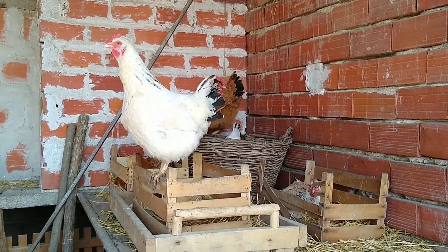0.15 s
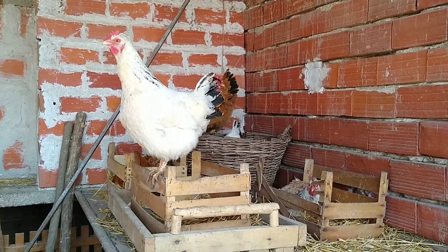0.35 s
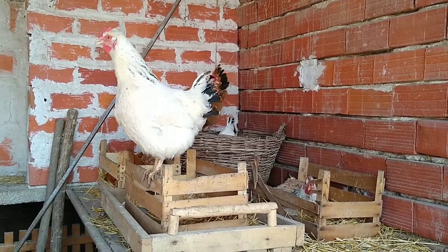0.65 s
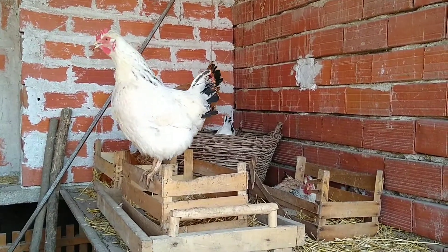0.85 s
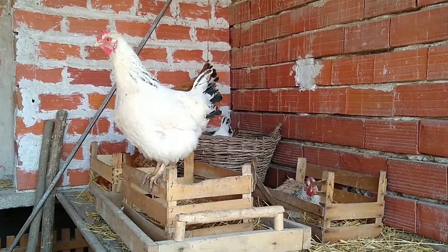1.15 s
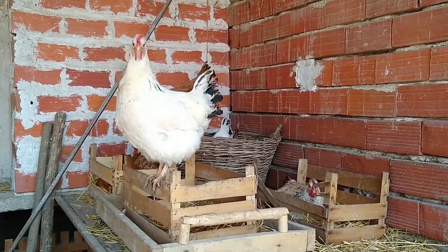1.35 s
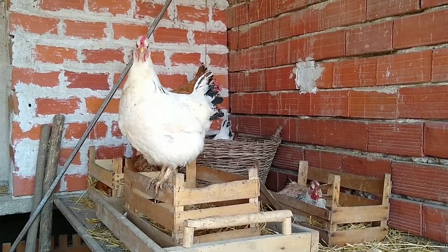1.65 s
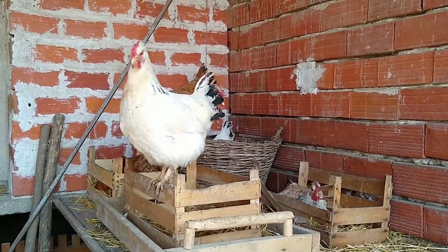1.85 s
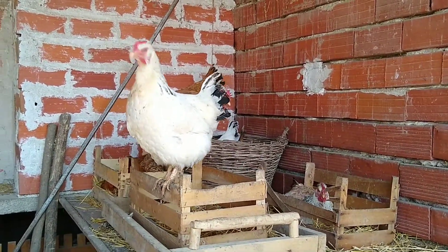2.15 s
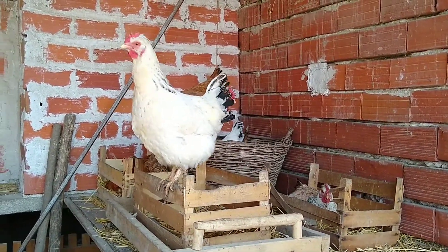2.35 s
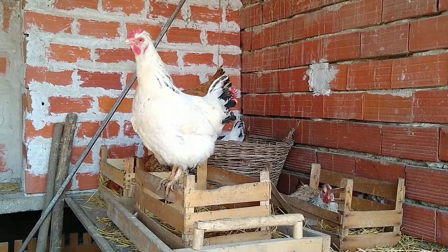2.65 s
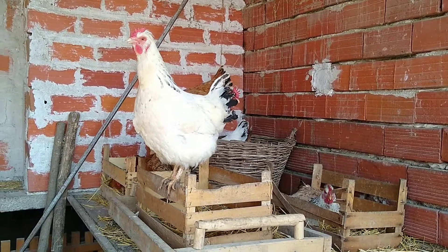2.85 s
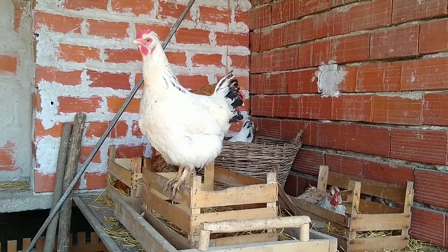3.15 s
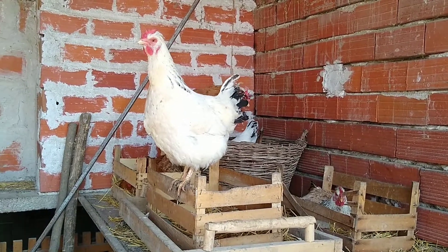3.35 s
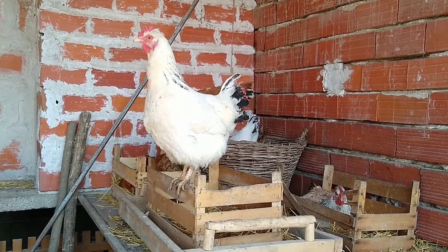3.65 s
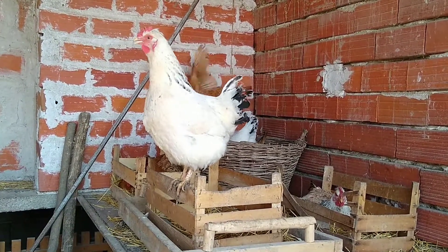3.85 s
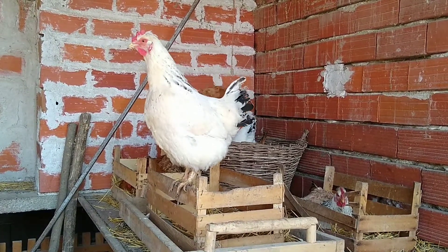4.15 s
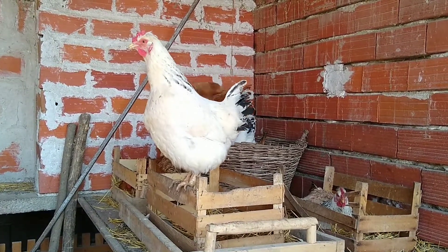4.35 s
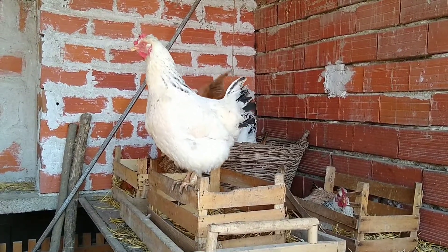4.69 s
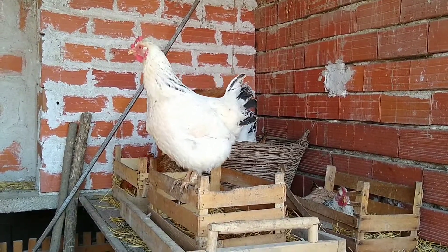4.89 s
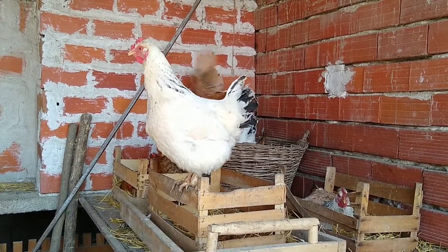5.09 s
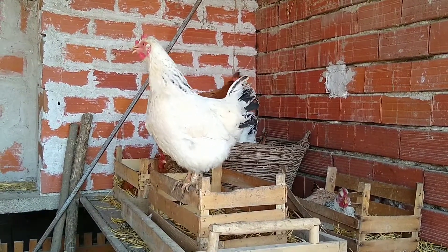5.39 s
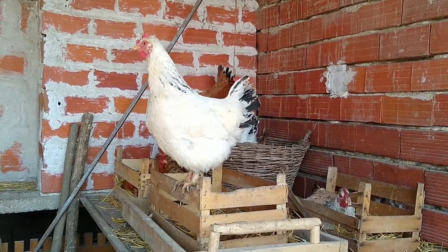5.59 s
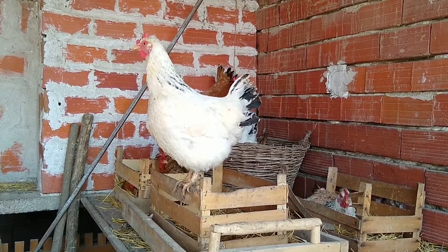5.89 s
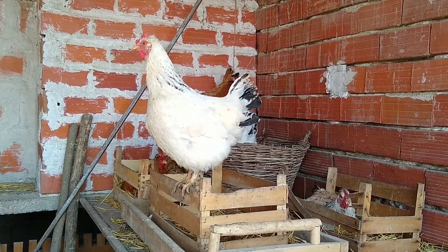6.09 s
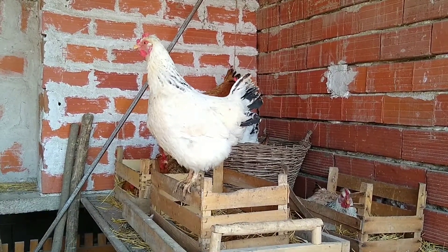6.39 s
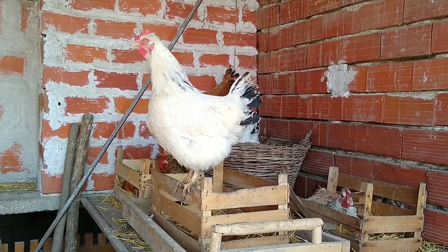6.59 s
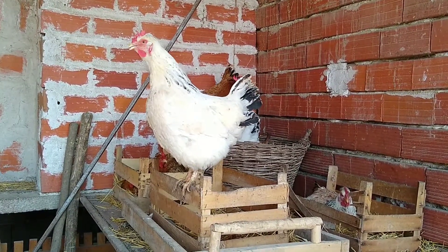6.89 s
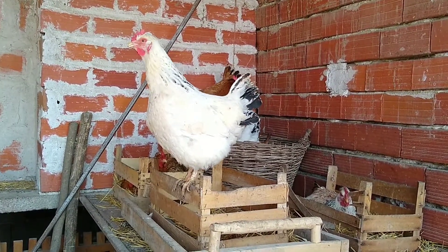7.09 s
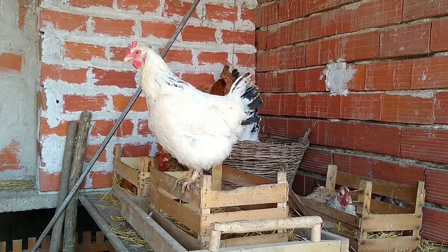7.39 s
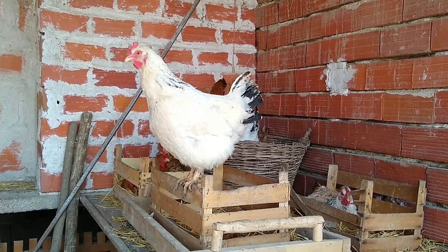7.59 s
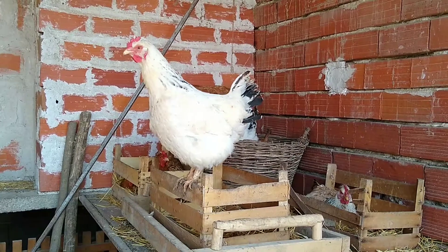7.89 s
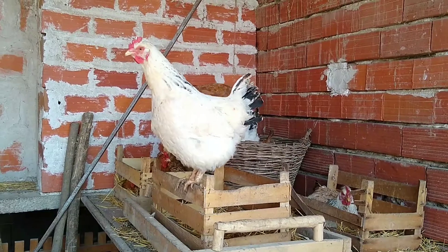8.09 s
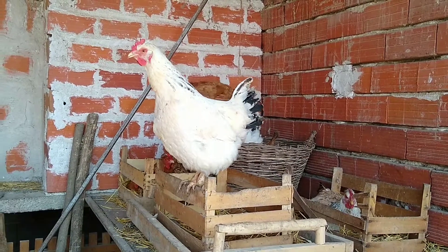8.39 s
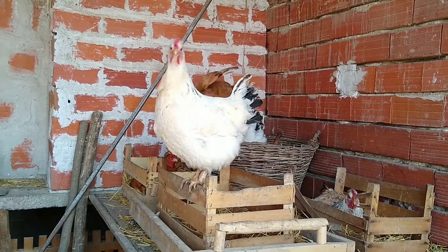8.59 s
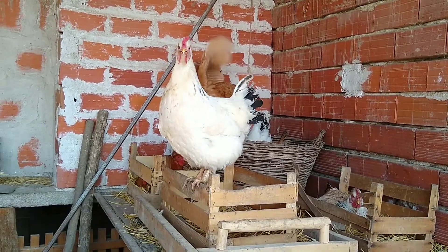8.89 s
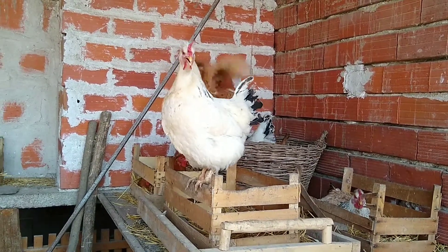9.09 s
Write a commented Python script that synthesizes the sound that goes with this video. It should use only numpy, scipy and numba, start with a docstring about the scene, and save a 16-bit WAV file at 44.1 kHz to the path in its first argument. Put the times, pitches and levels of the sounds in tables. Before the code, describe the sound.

Quick low clucks come in uneven bursts, punctuated by sharp higher squawks from a few chickens, close up in a small brick shelter.

```python
"""Hens in a brick coop

Runs of short clucks, broken by long high and low squawks from several hens. Each voice is
syrinx pulses and breath noise filtered by throat, chest, mouth and beak, with echoes of decaying noise.
A crate is tapped once. The hand-held two-port recorder adds thumps, a low rumble and capsule hiss
to the faint air of the coop."""
import sys
import numpy as np
from scipy import signal
from scipy.fft import rfft, irfft, next_fast_len
from scipy.io import wavfile
from scipy.ndimage import uniform_filter1d
from numba import njit

SR = 44100
rng = np.random.default_rng(int(sys.argv[2]) if len(sys.argv) > 2 else 0)


def unload_wav(signal):
    """Save mono or channel-first audio to the path in sys.argv[1] as 16-bit WAV at rate SR, clipped to [-1, 1]."""
    wavfile.write(
        sys.argv[1],
        SR,
        np.round(np.clip(np.atleast_2d(signal).T, -1, 1) * 32767).astype(np.int16),
    )


N = 407484

# One row per cluck: t/s, level/dB before its swell, rise/s, length/s, pitch f/Hz before its arch, mouth f/Hz
CLUCK_CALLS = [(0.624, -19, 0.027, 0.0943, 246.3, 2048), (1.142, -33.5, 0.0089, 0.044, 236.2, 2320),
               (1.35, -21.5, 0.03, 0.0658, 248.9, 2786), (1.567, -27, 0.017, 0.058, 250.8, 3325),
               (1.774, -23.5, 0.027, 0.0554, 248.8, 2385), (1.962, -16.5, 0.035, 0.062, 248.1, 2660),
               (2.064, -26.5, 0.02, 0.0638, 273.8, 2880), (2.228, -16, 0.034, 0.059, 246.9, 2315),
               (2.338, -27.5, 0.018, 0.07, 274.3, 2960), (2.494, -17, 0.044, 0.075, 251.5, 2240),
               (2.554, -19.5, 0.025, 0.075, 232.1, 2480), (2.612, -17.5, 0.03, 0.079, 248, 2270),
               (2.855, -29.5, 0.022, 0.087, 260.9, 2160), (3.134, -26, 0.03, 0.066, 263.6, 2174),
               (3.4, -35.5, 0.018, 0.043, 258.7, 1865), (3.451, -27, 0.035, 0.071, 272, 2720),
               (3.554, -20, 0.026, 0.05446, 236, 2967), (3.634, -35, 0.015, 0.051, 246.4, 2400),
               (3.684, -26, 0.02, 0.075, 287.2, 2810), (3.845, -17.5, 0.025, 0.0822, 253.1, 2470),
               (4.263, -31.5, 0.024, 0.082, 278, 2850), (4.572, -25.5, 0.027, 0.0587, 275.7, 2205),
               (4.689, -17.5, 0.019, 0.067, 229.9, 1914), (4.816, -31.5, 0.026, 0.062, 228.1, 1966),
               (5.193, -27.5, 0.035, 0.076, 238.1, 3012), (5.26, -29.5, 0.015, 0.041, 287.4, 2767),
               (5.707, -40, 0.013, 0.0403, 222.6, 2860), (5.929, -40.5, 0.01, 0.0451, 206.7, 2731),
               (6.367, -20, 0.032, 0.061, 244, 2340), (6.6, -17, 0.062, 0.0997, 253.5, 2014),
               (7.164, -31, 0.033, 0.077, 208.7, 1852), (7.362, -33, 0.025, 0.063, 251, 2030),
               (7.458, -27.5, 0.041, 0.064, 254.3, 2866), (7.608, -31, 0.023, 0.062, 231, 2800),
               (7.778, -19.5, 0.039, 0.071, 245.8, 2850), (7.898, -32.5, 0.0026, 0.057, 227.5, 2988),
               (8.049, -18.5, 0.026, 0.065, 239.2, 2340), (8.251, -33.5, 0.017, 0.051, 201, 2830),
               (8.378, -19.5, 0.029, 0.072, 239.1, 2320), (8.549, -27, 0.04, 0.054, 255.2, 2020),
               (8.637, -19, 0.031, 0.073, 238.4, 2790), (8.794, -29, 0.024, 0.0755, 236.7, 2108),
               (8.908, -17.5, 0.03, 0.078, 256, 2520), (9.066, -31, 0.015, 0.04, 240.2, 2100)]
# Effort from soft to loud: level/dB at either end
EFFORT_LEVELS = (-29.5, -22.5)
# Values at the (soft, loud) ends: throat f/Hz at full opening, base brightness level/dB, roughness [0-1]
EFFORT_THROAT = (857, 1000.9)
EFFORT_BRIGHTNESS = (-16, -19.5)
EFFORT_ROUGHNESS = (0.48, 0.5512)
# A wider mouth rings higher and stronger: f/Hz, level/dB
CLUCK_MOUTH_GAIN = [(2100, -1), (2500, 5), (2900, 11.5)]
# Cluck pitch at start, top of the rise and end [share of its pitch]
PITCH_ARCH = (0.72, 1.05, 0.94)
# Beak resonances in a cluck: f/Hz, width/Hz, level/dB
CLUCK_BEAK_RINGS = [(3240, 280, 1), (3726, 420, 3.5)]


def clucks():
    """Each cluck snaps on, swells while the beak opens and the pitch arches, then is choked off."""
    out = np.zeros(N)
    for start, peak_db, rise, length, pitch, mouth in CLUCK_CALLS:
        throat = np.interp(peak_db, EFFORT_LEVELS, EFFORT_THROAT)
        bright_db = np.interp(peak_db, EFFORT_LEVELS, EFFORT_BRIGHTNESS)
        rough = np.interp(peak_db, EFFORT_LEVELS, EFFORT_ROUGHNESS)
        t = np.arange(round((length + 0.024) * SR)) / SR
        opening = np.interp(t, [0, rise, length], [0, 1, 0.85])
        arch = np.interp(t, [0, rise, length], PITCH_ARCH)
        swell_s = [0, 0.0015, rise, 0.5 * (rise + length), length, length + 0.028]
        swell_db = np.interp(t, swell_s, [-48.5, -15.5, 3.0, 3.5, -5.5, -36.5])
        # soft clucks keep the beak closed, so chest and air sacs stand out
        softness_db = -16.5 - peak_db
        sound = voice(
            pitch * arch, throat * (0.65 + 0.35 * opening),
            mouth, at_hz(CLUCK_MOUTH_GAIN, mouth), CLUCK_BEAK_RINGS,
            chest_db=-12 + 0.067 * softness_db, boom_db=-30 + 0.7 * softness_db,
            bright_db=bright_db - 2.5 + 0.42 * swell_db, rough=rough, half=0.0)
        add(out, amp(peak_db + swell_db) * sound, start)
    return out


# One list per high squawk, from more than one hen: t/s, pitch f/Hz, level/dB, hoarseness [about 0-1]
HIGH_CALLS = [
    [(0.785, 534, -34.5, 0.7), (0.797, 544.3, -10, 0.7), (0.835, 586, -16.5, 1), (0.875, 527.3, -16, 0),
     (0.969, 502.7, -27, 0.05), (1.039, 550, -13, 0.05), (1.065, 482.6, -19.5, 0.3), (1.088, 485, -28, 0.7)],
    [(3.978, 504.4, -28, 0.5), (3.996, 516, -10.5, 0.9), (4.024, 602.5, -16.5, 1.1),
     (4.056, 508, -12, 0.05), (4.1, 521.3, -21.5, 0.2), (4.132, 524, -21, 1.1), (4.17, 526.8, -16, 0.05),
     (4.21, 502, -23.5, 0.4), (4.25, 469, -38.5, 0.6)],
    [(4.907, 522, -31.5, 0.5), (4.92, 545.6, -17.5, 1.0), (4.935, 576, -18.5, 0.9),
     (4.955, 570.7, -22, 0.5), (4.99, 554.6, -22.5, 0.63), (5.047, 533, -16.5, 0.3),
     (5.095, 499.6, -26, 0.5), (5.13, 488, -29, 0)],
    [(5.46, 510.6, -10, 0.6), (5.502, 532.3, -25.5, 0.6), (5.558, 492.1, -16, 0.6),
     (5.64, 456.3, -34.5, 0.6), (5.67, 428, -43, 0.9)],
    [(6.764, 457, -23.5, 0.8), (6.786, 554, -11.5, 0.9), (6.82, 584.2, -19, 0.5),
     (6.855, 502.7, -17.5, 0.15), (6.9, 503.6, -30.5, 1), (6.94, 524.7, -26.5, 0.7), (6.996, 476, -16, 0.2),
     (7.035, 450.4, -50, 0)],
    [(9.092, 480.5, -29.5, 0.6), (9.106, 519.8, -9, 0.6), (9.128, 566, -18, 0.4), (9.174, 471.3, -20, 0.1),
     (9.24, 453, -25.5, 0.15)],
]
# One list per low squawk: t/s, pitch f/Hz, level/dB, hoarseness [0-1]
LOW_CALLS = [
    [(0.0, 326.6, -7.5, 0.26), (0.016, 330.2, -17.5, 0.05), (0.042, 337.4, -18, 0.05),
     (0.058, 355, -21.5, 0.86), (0.085, 325.3, -30.5, 0.9), (0.12, 320, -42, 0.9)],
    [(5.298, 304, -37.5, 1), (5.314, 317, -12.5, 0.38), (5.34, 345, -17.5, 0.5), (5.37, 346, -16.5, 0.08),
     (5.46, 347, -19.5, 0.071), (5.52, 338, -20, 0.14), (5.56, 348.4, -22, 0.2), (5.58, 359.6, -21, 0.87),
     (5.62, 330, -43, 0.6)],
]
# One row per squawk: mouth f/Hz at mean pitch, mouth level/dB,
# base beak brightness level/dB for a call at -18 dB, half-pitch share per hoarseness
HIGH_CALL_MOUTHS = [(1852, 4.5, -15.5, 0.55), (1987, 1.5, -14.5, 0.6), (2608, 9, -12, 1.2),
                    (2005, 0.5, -14.5, 0.84), (1960, 2, -13, 0.797), (2068, 1.5, -12.5, 0.34)]
LOW_CALL_MOUTHS = [(2050, 2.2, -11, 0.14), (1963, 0.071, -11, 0.1)]
# Beak resonances for the high and the low squawks: f/Hz, width/Hz, level/dB
HIGH_BEAK_RINGS = [(3357, 53, 0.28), (3506, 380, 4)]
LOW_BEAK_RINGS = [(2375, 200, -3), (3224, 200, 8.5), (3670, 860, 0)]
HIGH_THROAT_HZ, LOW_THROAT_HZ = 1050.9, 1169
CLEAR_ROUGH, HOARSE_ROUGH = 0.15, 0.65  # roughness at hoarseness 0 and 1
BEAK_STEADY = 0.18  # share of the level swing that the beak does not follow
BEAK_OPEN_S, BEAK_SHUT_DB = 0.016, -12.5  # the beak opens just after the start
SQUAWK_LOW_CUT_HZ = 410  # a stretched neck and open beak radiate little below this


def squawks(calls, throat, mouths, beak, chest_db):
    """Long calls on a held breath; hoarse stretches turn rough and break into half pitch."""
    out = np.zeros(N)
    for rows, (mouth, mouth_db, beak_db, most_half) in zip(calls, mouths):
        times, *columns = np.transpose(rows)
        t = np.arange(times[0], times[-1], 1 / SR)
        pitch, level_db, hoarse = [np.interp(t, times, column) for column in columns]
        rough = CLEAR_ROUGH + (HOARSE_ROUGH - CLEAR_ROUGH) * hoarse
        swing_db = np.clip(level_db + 18, -10, 10)
        shut = np.clip(1 - (t - times[0]) / BEAK_OPEN_S, 0, 1)
        bright_db = beak_db - BEAK_STEADY * swing_db + BEAK_SHUT_DB * shut
        to_nearest_end = np.minimum(t - times[0] + 0.003, times[-1] - t + 0.0028)
        edges = np.clip(to_nearest_end / 0.0012, 0, 1)
        sound = voice(pitch, throat + 0 * t, mouth, mouth_db, beak, chest_db, -57.5,
                      bright_db, rough, most_half * hoarse)
        add(out, edges * amp(level_db) * sound, times[0])
    low_cut = signal.butter(4, SQUAWK_LOW_CUT_HZ, "high", fs=SR, output="sos")
    return signal.sosfilt(low_cut, out + 1e-18)


# Chest resonance, one pair: f/Hz, width/Hz
CHEST_RING = (621.4, 394.7)
# Upper resonances shared by all calls: f/Hz, width/Hz, level/dB
RASP_RINGS = [(5137, 560, -12), (5970, 1200, -18.5), (10800, 36000, -21)]
THROAT_WIDTH_HZ, MOUTH_WIDTH_HZ = 250.36, 260


def voice(pitch, throat, mouth, mouth_db, beak, chest_db, boom_db, bright_db, rough, half):
    """Syrinx pulses and pulsed breath pass throat, chest, mouth and beak; low and high parts are evened."""
    count, rough, half = len(pitch), np.clip(rough, 0, 1), np.clip(half, 0, 1)
    jitter = 0.0985 * rough ** 1.495 * wander(count, 261.2)
    phase = 2 * np.pi * (rng.random() + np.cumsum(pitch * (1 + jitter)) / SR)
    orders = np.arange(1, int(17000 / pitch.max()))[:, None]
    pulses = np.cos(orders * phase).sum(axis=0) * np.sqrt(pitch / SR) * 2
    pulses *= 1 + half * np.cos(phase / 2)  # strong-weak pairs give half-pitch lines
    pulses *= amp(8 * rough * wander(count, 90))  # uneven pulse strength
    breath = rng.standard_normal(count) * (1 + 0.7 * np.cos(phase))  # gated by each cycle
    source = np.sqrt(1 - rough ** 2) * pulses + 0.9 * rough ** 1.5 * breath

    low = glide_twice(source, throat, THROAT_WIDTH_HZ)
    low -= amp(chest_db) * resonate_twice(source, *CHEST_RING)
    low += amp(boom_db) * resonance(source, pitch.mean(), 160)  # air sacs swell with the fundamental

    # the mouth opens as the pitch climbs
    mouth_hz = mouth * (pitch / pitch.mean()) ** 0.8
    high = amp(mouth_db) * glide_twice(source, mouth_hz, MOUTH_WIDTH_HZ)
    for hz, width, db in beak + RASP_RINGS:
        # grainy breath takes a larger share in higher resonances
        grain = breath * amp(8.3 * wander(count, 65))
        airy = source + np.clip(hz / 12000, 0, 1) ** 2 * grain
        high += amp(db) * resonate_twice(airy, hz, width)
    return even(low) + amp(bright_db - 0.5) * even(high)


KNOCK_S, KNOCK_DB = 0.512, -34


def knock():
    """A dull tap on a crate: a soft click ringing briefly in thin wood."""
    click = np.zeros(N) + 1e-18
    click[round(KNOCK_S * SR)] = 1
    ring = resonance(click, 300, 350) - resonance(click, 1000, 810)
    return amp(KNOCK_DB) * ring / np.abs(ring).max()


# Thumps on the housing: t/s, relative level/dB, length/s
HOUSING_THUMPS = [(0.597, -48.5, 0.057), (2.498, -54.5, 0.042), (7.62, -63, 0.049), (7.912, -38.5, 0.042),
                  (8.026, -39.5, 0.026), (8.064, -50.5, 0.028), (8.226, -34.5, 0.017), (8.676, -44, 0.03)]


def thumps():
    """Each push on the housing starts quick and slackens, so its tone sinks."""
    out = np.zeros(N)
    for start, level_db, length in HOUSING_THUMPS:
        t = np.arange(round(length * SR)) / SR
        cycles = np.cumsum(70 + 150 * np.exp(-t / 0.01)) / SR
        swell = np.sin(np.pi * t / length) ** 0.83
        add(out, amp(level_db + 16.5) * swell * np.sin(2 * np.pi * cycles), start)
    return out


def rumble():
    """The housing rocks in the hand: noise through two low resonances, its level lumpy."""
    rocking = resonance(resonance(rng.standard_normal(N), 79, 49), 60, 160)
    return amp(-56.5 + 4.5 * wander(N, 20)) * rms_one(rocking)


def handling():
    """Rumble and thumps push one port while pulling the other."""
    return (rumble() + thumps()) * [[0.75], [-1]]


# Echo decay between the brick walls: f/Hz, time to fall 60 dB/s
COOP_DECAY = [(200, 0.397), (1000, 0.22), (3000, 0.16), (8000, 0.097)]
# Echo that differs between the ports: f/Hz, strength relative to the shared echo
ECHO_SPREAD = [(200, 1.0), (600, .45), (1200, .3), (3000, .9), (8000, 4)]
YARD_DB, YARD_T60_S = -24.5, 0.81  # tail of the shed beyond, relative to the coop's start


def coop(x):
    """Dense brick-wall echoes in octave bands of dying noise, and a faint long tail from the shed beyond."""
    t = np.arange(round(1.2 * SR)) / SR
    tails = np.zeros((2, len(t)))
    for low in 150 * 2.0 ** np.arange(7):
        centre = np.sqrt(2) * low
        band = signal.butter(2, [low, min(2 * low, 19000)], "band", fs=SR, output="sos")
        shared, *own = signal.sosfilt(band, rng.standard_normal((3, len(t))))
        decay = amp(-60 * t / at_hz(COOP_DECAY, centre)) + amp(YARD_DB - 60 * t / YARD_T60_S)
        tails += (shared + at_hz(ECHO_SPREAD, centre) * np.array(own)) * decay
    tails *= np.clip((t - 0.003) / 0.0039, 0, 1)  # silent gap, then the echoes build up
    return amp(-35.0) * signal.fftconvolve(x[None], tails, axes=1)[:, :N]


# Spectrum of the coop air: f/Hz, relative level/dB
AIR_SPECTRUM = [(88, -26), (150, -10.5), (179, -0.5), (372, -9.5), (829, -6), (1070, 1.5), (2290, -30),
                (3050, -14), (3840, -27.5), (4990, -74), (8450, -120)]


def air():
    """Faint coop air: shaped noise, mostly alike at both ports, with a slightly wavering level."""
    white = rng.standard_normal((3, N))
    gain = amp(at_hz(AIR_SPECTRUM, np.fft.rfftfreq(N, 1 / SR)))
    shaped = irfft(rfft(white[0] + 0.12 * white[1:]) * gain, N)
    return amp(-58.5 + 1.5 * wander(N, 5)) * rms_one(shaped)


def hiss():
    """Capsule noise: white and independent in the two channels."""
    return amp(-78) * rng.standard_normal((2, N))


# The two ports: f/Hz, phase of right ahead of left/rad, left over right level/dB
PORT_OFFSETS = [(0, 0, 1), (1500, 0, 1), (2050, -3.1, 0), (4400, 3.1, 0), (5000, 3.4, 1), (5300, 6.5, 2),
                (6000, 6.5, 4), (6300, 3.6, 5), (7100, 3.1, 7), (15500, -17, 8)]
# Colour of the microphone and nearby crates: f/Hz, level/dB
MICROPHONE_COLOUR = [(120, 3), (260, -1), (365, 7.5), (480, -1), (1400, 3), (1780, 3.5), (2050, 8.5),
                     (6500, -6), (7500, -15.5), (13000, -21.5)]


def ports(x):
    """Spacing and stereo mixing of the two ports turn the phase and tilt the treble to the left."""
    size = next_fast_len(N + 4096)
    hz, table = np.fft.rfftfreq(size, 1 / SR), np.array(PORT_OFFSETS)
    turn, lean_db = [np.interp(hz, table[:, 0], table[:, k]) for k in (1, 2)]
    shift = np.exp(0.5j * turn) * amp(-lean_db / 2)
    colour = amp(at_hz(MICROPHONE_COLOUR, hz))
    return irfft(rfft(x, size) * colour * np.array([1 / shift, shift]), size)[:, :N]


def amp(db):
    """Gain of a level in dB."""
    return 10 ** (np.asarray(db) / 20)


def at_hz(points, hz):
    """A table read on a log-frequency axis."""
    table = np.array(points)
    return np.interp(np.log(hz + 1), np.log(table[:, 0]), table[:, 1])


def rms_one(x):
    """Scaled to rms 1."""
    return x / np.sqrt(np.mean(x ** 2) + 1e-20)


def even(x):
    """Divided by its own moving rms, with a floor that leaves the faintest parts low."""
    return x / np.sqrt(uniform_filter1d(x ** 2, size=1300) + 0.0029 * np.mean(x ** 2))


def wander(count, rate):
    """Straight lines between normal draws of spread 1, with a new draw rate times a second."""
    knots = np.arange(0, count + SR / rate, SR / rate)
    return np.interp(np.arange(count), knots, rng.standard_normal(len(knots)))


def resonance(x, hz, width):
    """Two-pole peak of gain 1; a wider peak dies sooner."""
    r = np.exp(-np.pi * width / SR)
    feedback = [1, -2 * r * np.cos(2 * np.pi * hz / SR), r * r]
    return signal.lfilter([(1 - r * r) / 2, 0, -(1 - r * r) / 2], feedback, x)


def resonate_twice(x, hz, width):
    """Two equal resonances in a row, for steeper flanks."""
    return resonance(resonance(x, hz, width), hz, width)


@njit
def gliding_resonance(x, cosine, r):
    """Two-pole peak of gain 1 whose centre moves sample by sample."""
    y = np.zeros(len(x))
    for i in range(2, len(x)):
        y[i] = (1 - r * r) / 2 * (x[i] - x[i - 2]) + 2 * r * cosine[i] * y[i - 1] - r * r * y[i - 2]
    return y


def glide_twice(x, hz, width):
    """Two equal gliding resonances in a row."""
    r, cosine = np.exp(-np.pi * width / SR), np.cos(2 * np.pi * hz / SR)
    return gliding_resonance(gliding_resonance(x, cosine, r), cosine, r)


def add(track, sound, start):
    """Mixes a sound into the track from a start time in seconds."""
    at = round(start * SR)
    track[at:at + len(sound)] += sound[:N - at]


def scene():
    """Hens, crate tap, their echoes and the air reach the ports; handling noise and hiss go straight in."""
    dry_coop = clucks()
    dry_coop += squawks(HIGH_CALLS, HIGH_THROAT_HZ, HIGH_CALL_MOUTHS, HIGH_BEAK_RINGS, chest_db=-10.0)
    dry_coop += squawks(LOW_CALLS, LOW_THROAT_HZ, LOW_CALL_MOUTHS, LOW_BEAK_RINGS, chest_db=-15.5)
    dry_coop += knock()
    return ports(dry_coop + coop(dry_coop) + air()) + handling() + hiss()


def record(dry):
    """The recorder rounds only the highest peaks and cuts the top above 15400 Hz."""
    rounded = dry / (1 + (dry / 0.85) ** 4) ** 0.25
    top_cut = signal.ellip(12, 0.5, 70, 15400, fs=SR, output="sos")
    return signal.sosfilt(top_cut, rounded)


dry = scene()
out = record(dry)
unload_wav(out)
```